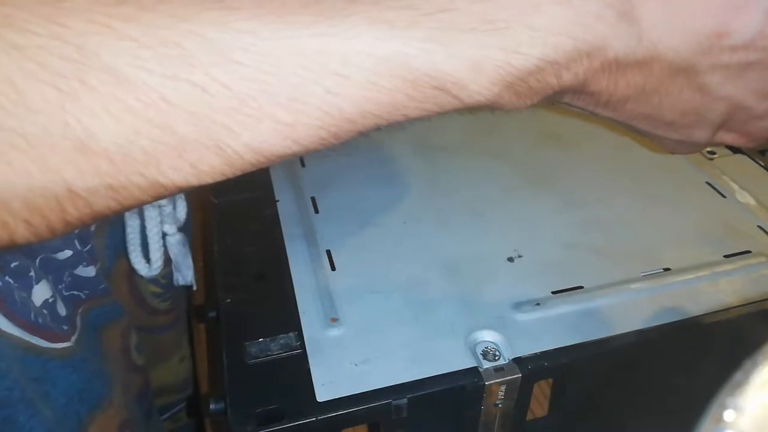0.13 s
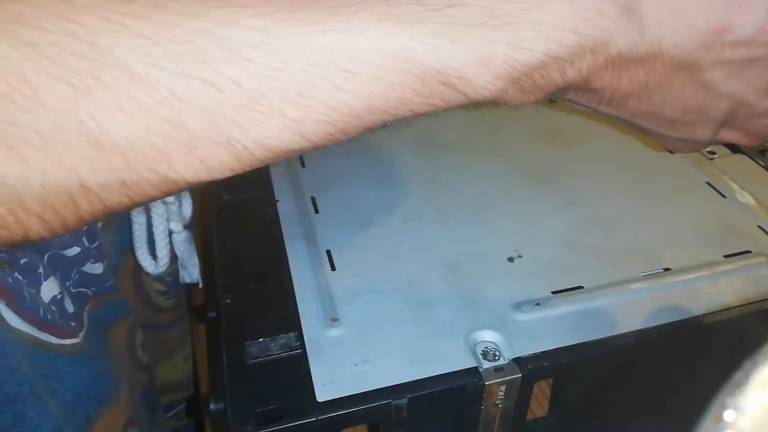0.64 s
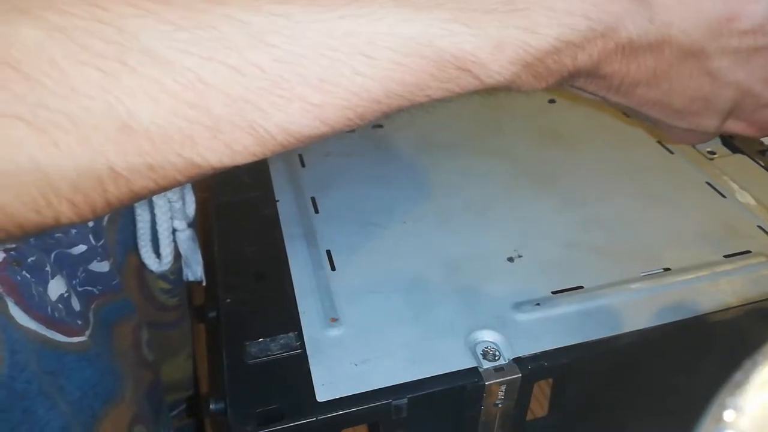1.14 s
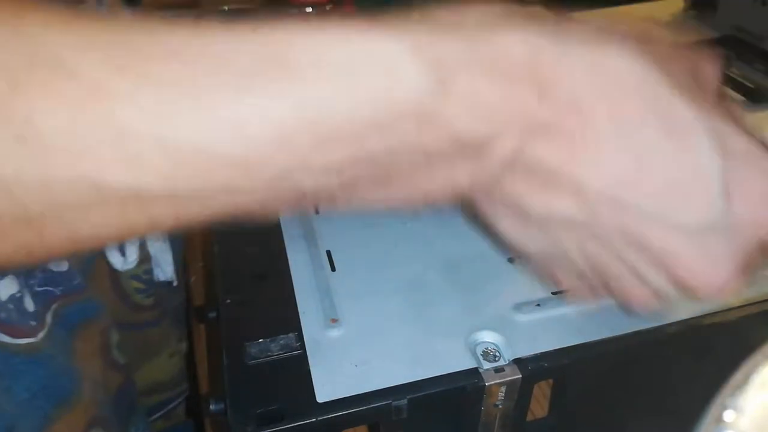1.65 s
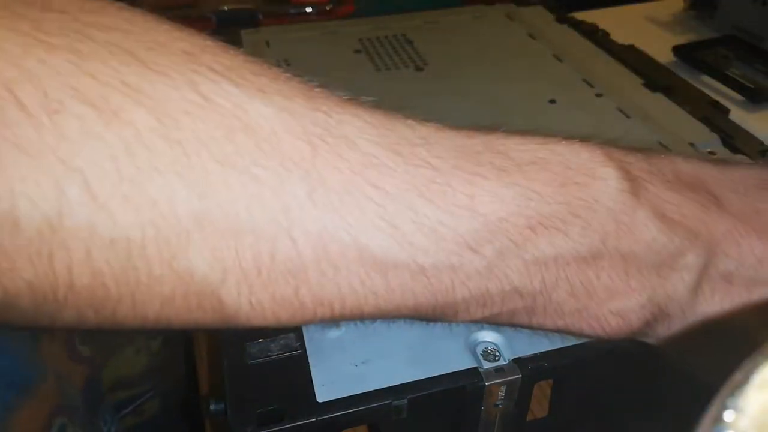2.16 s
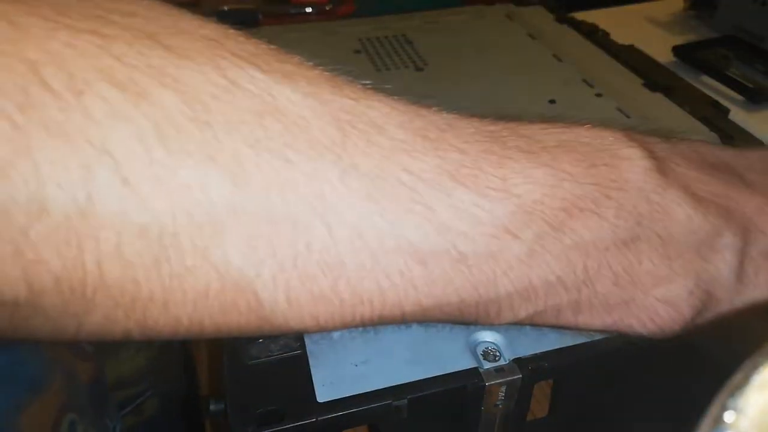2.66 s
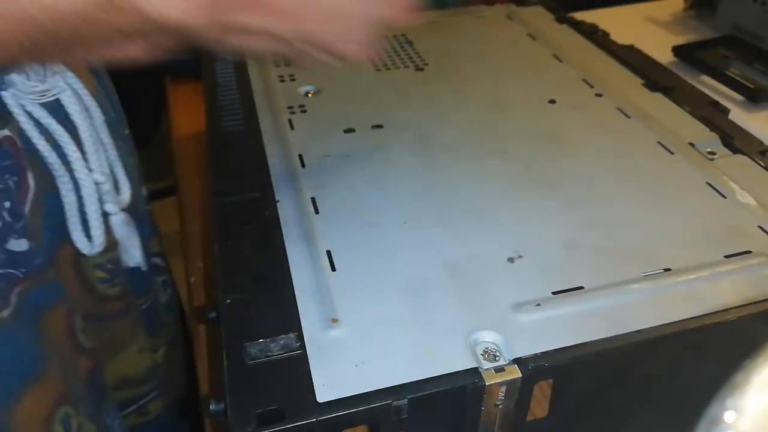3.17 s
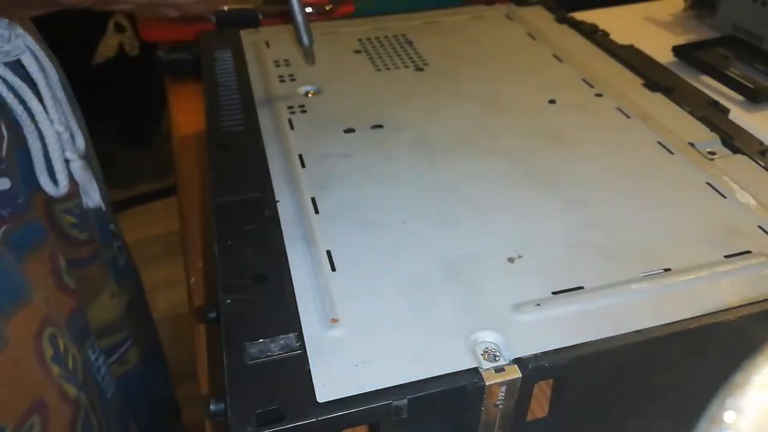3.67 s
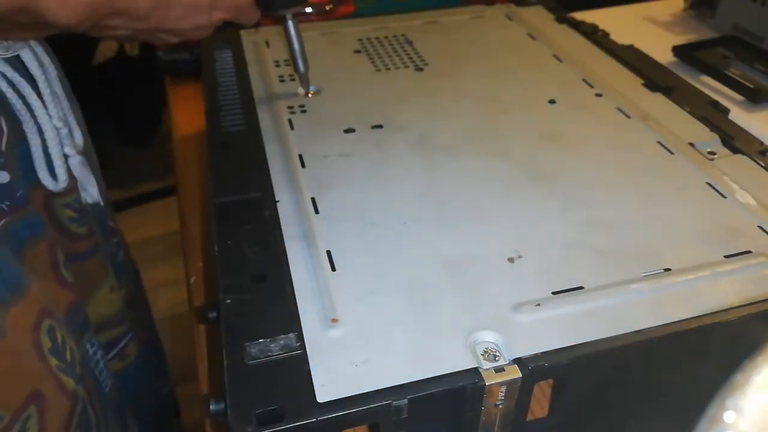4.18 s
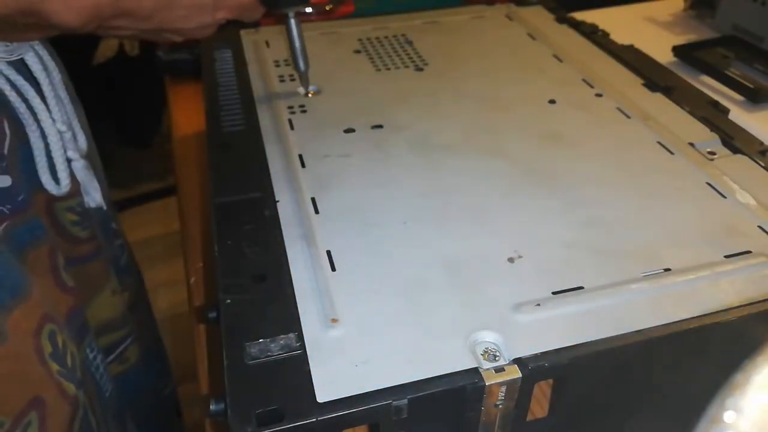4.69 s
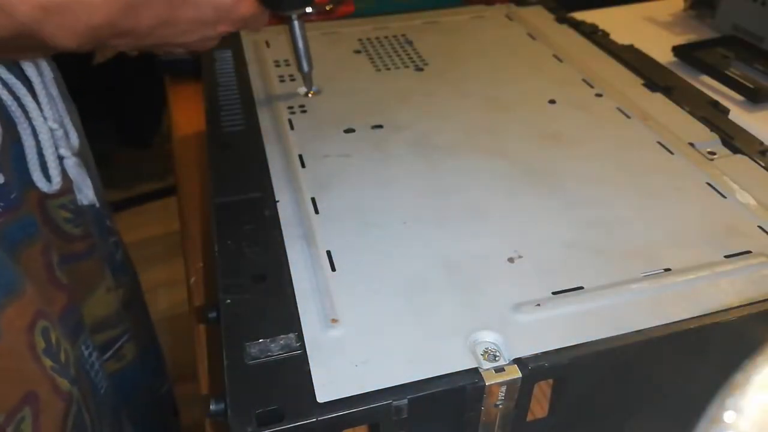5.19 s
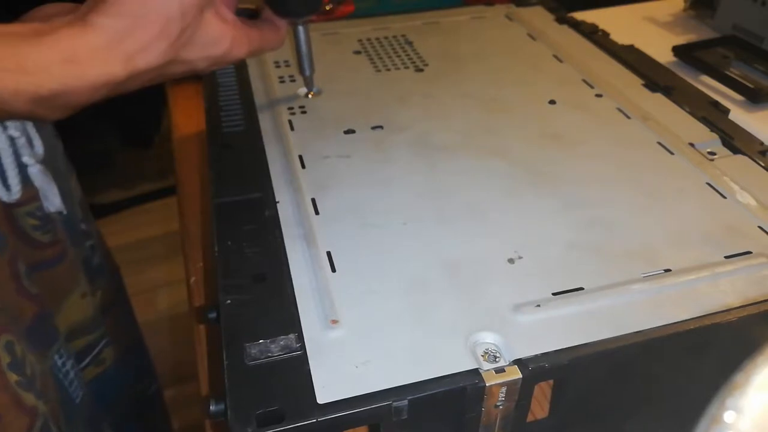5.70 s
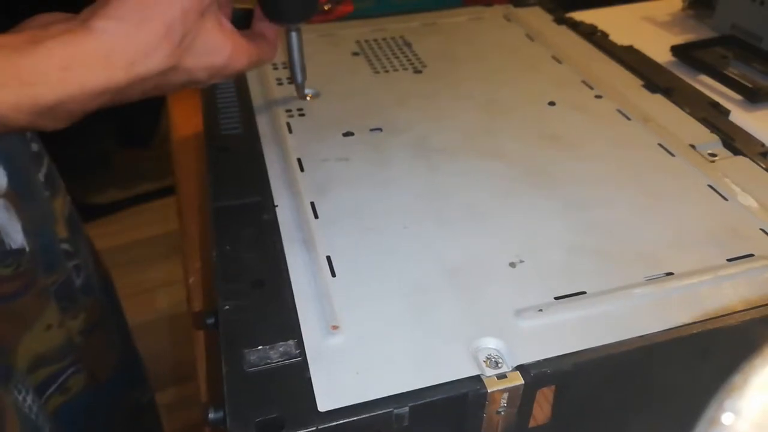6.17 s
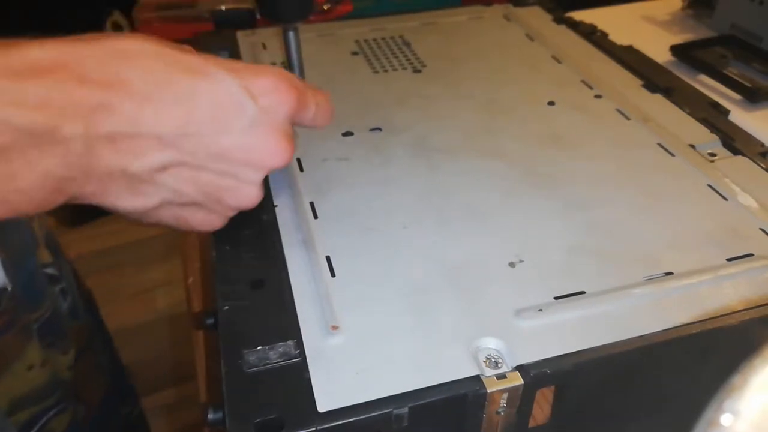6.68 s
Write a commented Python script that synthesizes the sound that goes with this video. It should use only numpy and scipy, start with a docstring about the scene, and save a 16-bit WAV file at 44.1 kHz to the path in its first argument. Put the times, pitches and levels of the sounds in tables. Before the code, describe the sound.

A small quiet room with faint air hiss and low rumble, heard in stereo an arm's length from the tool. From 0 to 1.1 s a steel bit lightly ticks and knocks on a sheet-metal panel, firmer near 1.05. At 1.28 and 1.37 s come two sharp clacks, with a tiny high whistle sagging in pitch between them. The cordless screwdriver then spins up fast and whines with bright, gritty gear hiss until 2.5 s, climbing slightly, soft thuds of the loose screw beneath, and brakes abruptly by 2.6 with three crisp clicks. Near quiet follows until a knock at 3.9 s, then irregular dull taps and ticks from 4.2 to 5.5. At 5.63 s a thin whistle and light gear crawl begin; loud clacks cluster around 5.8. A second, shorter, slightly softer run whirs from about 6.0 to 6.7 s, shaking the panel lower, then winds down quickly to a stop.

```python
"""On a bench in a small quiet room, a cordless screwdriver backs two screws out of a sheet-metal panel,
an arm's length from a stereo microphone. The motor sings on multiples of its shaft speed over noisy gear hiss
and shakes the panel's modes; the speed control whistles, a sine and its octave, at a light trigger pull.
Before and after the runs the bit ticks and knocks: short bursts ring the panel, and walls of decaying noise
answer everything the tool does."""
import sys
import numpy as np
from scipy import signal
from scipy.fft import rfft, irfft, next_fast_len
from scipy.io import wavfile
from scipy.ndimage import uniform_filter1d, map_coordinates

SR = 44100
rng = np.random.default_rng(int(sys.argv[2]) if len(sys.argv) > 2 else 0)


def voltage_ratio(level):
    """Linear amplitude factor for a level in decibels (scalar or array-like)."""
    return 10 ** (np.asarray(level, float) / 20)


def pcm_store(signal):
    """Save signal as 16-bit PCM."""
    levels = np.round(np.clip(np.atleast_2d(signal), -1, 1) * 32767)
    wavfile.write(sys.argv[1], SR, levels.astype(np.int16).T)


N = 300762
TIME = np.arange(N) / SR


def unit(x):
    """Scaled to rms 1."""
    return x / np.sqrt(np.mean(x ** 2))


def curve(rows, outside):
    """Columns of a table as tracks over time; a set value before and after it."""
    s, *columns = np.transpose(rows)
    return [np.interp(TIME, s, c, outside, outside) for c in columns]


def colour(x, points):
    """Noise given a spectrum of (Hz, dB) points, at rms 1."""
    hz, db = np.transpose(points)
    size = next_fast_len(N)
    log_hz = np.log(np.arange(size // 2 + 1) * SR / size + 1)
    shaped = rfft(x, size) * voltage_ratio(np.interp(log_hz, np.log(hz), db))
    return unit(irfft(shaped, size)[..., :N])


def band(x, lo_hz, hi_hz):
    """Band-pass."""
    return signal.sosfilt(signal.butter(2, [lo_hz, hi_hz], "band", fs=SR, output="sos"), x)


def walk(rate):
    """Random levels held 1 / rate s and smoothed twice."""
    k = int(SR / rate)
    held = np.repeat(rng.standard_normal(N // k + 1), k)
    return 0.95 * uniform_filter1d(uniform_filter1d(held, k), k)[:N]


def arch(start, length):
    """Rises from 0 to 1 and falls back over a span."""
    return np.sin(np.pi * np.clip((TIME - start) / length, 0, 1))


# Spectrum of the room's air. Each row: frequency in Hz, relative level in dB.
ROOM_AIR = [(18, -9), (30, 8.5), (69, 0), (108, -7), (318, -14), (471, -21.5), (1180, -18), (2330, -21.5),
            (3460, -23), (9610, -27), (15800, -36)]
# The low rumble swells. Each row: start in seconds, length in seconds, level in dB.
RUMBLE_SWELLS = [(-2, 2.66, -49.5), (2.5, 1.2, -61.5), (2.5, 1.5, -64.5)]


def room():
    """Faint hiss, unrelated left and right above the bass, over a low wavering rumble of narrow-band noise."""
    mid, side = colour(rng.standard_normal((2, N)), ROOM_AIR)
    air = mid + band(band(side, 150, 18000), 120, 18000) * np.array([[1], [-1]])
    rumble = unit(band(band(rng.standard_normal(N), 48, 50), 42, 72))
    swell = sum(voltage_ratio(db) * arch(s, length) for s, length, db in RUMBLE_SWELLS)
    return voltage_ratio(-63.5) * air + (voltage_ratio(-78) + swell) * rumble


def walls(x, t60_bench=0.031, t60_low=0.28, t60_high=0.25):
    """Quick reflections off bench and arms, then a short room tail; alike at both microphones in the bass only."""
    t = TIME[:SR // 2]
    mid, side = rng.standard_normal((2, len(t)))
    noise = mid + voltage_ratio(-0.5) * band(band(side, 270, 19010), 270, 19010) * np.array([[1], [-1]])
    low = band(noise, 40.5, 1510)
    tail = low * voltage_ratio(-60 * t / t60_low) + (noise - low) * voltage_ratio(-60 * t / t60_high)
    tail = tail + voltage_ratio(13.5) * noise * voltage_ratio(-60 * t / t60_bench)
    tail = tail * np.clip(t / 0.0016 - .5, 0, 1)  # nothing returns in the first 0.8 ms
    # many surfaces: no broad band of pitch is favoured
    bins = rfft(tail, SR)
    tail = irfft(bins / np.sqrt(uniform_filter1d(np.abs(bins) ** 2, size=90) + 1e-9), SR)[:, :len(t)]
    return signal.oaconvolve(x[None], tail / np.sqrt(np.sum(tail ** 2) / 2), axes=1)[:, :N]


# Panel and bench modes. Each row: frequency in Hz, relative level in dB when struck at the first screw,
# the same at the second screw, decay by 60 dB in seconds.
PANEL_MODES = [(117, -26, -26, 0.016), (156.9, -10.5, -11, 0.29), (228, -9, -12, 0.13),
               (287.6, 2, -5, 0.045), (552, -7, 6, 0.025), (718, 3, 2.5, 0.017), (930, 8.5, 2, 0.017),
               (1119, 7.5, 8, 0.016), (1275, 7.5, 5, 0.02), (1418, 2.5, 4.5, 0.033), (1485, 1, -14, 0.07),
               (1630, -6, -6, 0.02), (1795, -13.5, -7, 0.03), (2380, -14, -9, 0.03), (2660, -14, -9, 0.03)]
LOW_MODES_HZ, MOVES_S = 450, 3.0  # top of the low modes; when the tool goes to the second screw


def panel(force, low):
    """The force rings the low or the high modes of the panel, weighted by the screw the tool is at."""
    t, out = TIME[:SR // 2], 0
    for screw, there in enumerate([TIME < MOVES_S, TIME >= MOVES_S]):
        ring = 0
        for hz, *struck_db, t60 in PANEL_MODES:
            if (hz < LOW_MODES_HZ) == low:
                ring = ring + voltage_ratio(struck_db[screw] - 60 * t / t60) * np.sin(2 * np.pi * hz * t)
        out = out + signal.oaconvolve(force[:N] * there, ring / np.abs(ring).max())[:N]
    return out


# Bit and tool against the panel, and at 5.665 and 5.687 s two cogging clicks of the motor at a light pull. Each
# row: time in seconds, then relative levels in dB of ring, thud, tick, snap.
KNOCKS = [(0.0, -34, -40, -40, -40), (0.131, -35, -38.5, -27, -31), (0.146, -35.5, -58, -37.5, -59),
          (0.414, -52, -51.5, -62, -71), (0.822, -57, -46, -70, -70), (0.832, -34, -38, -37.5, -47),
          (0.85, -39, -44, -34, -45), (0.869, -37, -35.5, -32, -46.5), (1.041, -46, -49, -48, -55),
          (1.047, -26, -37.5, -40, -44), (1.051, -21, -36, -34, -44), (1.056, -36, -26.5, -22, -28.5),
          (1.275, -33, -43, -39, -42.5), (1.282, -15.5, -31, -13, -14.5), (1.369, -16, -19.5, -16, -16),
          (2.586, -29.5, -48, -30, -25.5), (2.623, -34.5, -45, -26, -21.5), (2.653, -36, -67, -22, -19.5),
          (3.368, -55.5, -71, -69, -75.5), (3.914, -20, -36, -29.5, -43.5), (4.21, -32, -42.5, -79, -67),
          (4.377, -21, -33, -39, -51), (4.422, -29.5, -38.5, -22, -25.5), (4.479, -26, -43, -35, -43.5),
          (4.523, -36, -50.5, -47.5, -58), (4.745, -26, -44, -37.5, -50), (4.993, -45.5, -53, -65, -70),
          (5.003, -32, -29.5, -38.5, -39), (5.02, -27.5, -49, -49.5, -55),
          (5.177, -27.5, -48, -40.5, -54.5), (5.23, -43, -60, -75, -77), (5.285, -34.5, -60, -68, -81.5),
          (5.319, -29, -41.5, -68, -68.5), (5.401, -53, -67.5, -80, -82), (5.449, -45.5, -52, -69.5, -71),
          (5.459, -35, -61, -75, -76), (5.636, -45, -48, -48, -60), (5.665, -66, -68, -62, -46.5),
          (5.687, -59, -68, -58, -43), (5.786, -15, -30, -19, -22), (5.789, -8, -26, -13, -18),
          (5.811, -15.5, -50, -19.5, -22), (5.816, -10.5, -33, -12.5, -12),
          (5.822, -7.5, -27, -11.5, -13.5)]
# The loose screw rocks in its hole. Each row: time in seconds, relative thud level in dB.
SCREW_THUDS = [(2.223, -27), (2.334, -25.5), (2.455, -29), (2.509, -38)]
# the duller a contact against its ring, the longer it lasts
HARD_MS, SOFT_MS, MS_PER_DB = 1.1, 5.4, 1
# a duller contact pushes more softly and scatters less (dB per dB)
PAD_MS_PER_DB, CLEAN = 0.005, 0.23
# in ring and in tick: strength of the first clean blow against the scatter after it
LEAD, CRACK = voltage_ratio(-6.5) * 1.79, 4.5


def knocks():
    """Each contact: a blow and scattered impacts on the high modes, a tick, a snap, and a push on the low modes."""
    ring, thud, tick, snap = np.zeros((4, N + 2048))
    t = TIME[:2048]
    push = np.hanning(int(0.0036 * SR))
    push = push / push.sum()
    for s, ring_db, thud_db, tick_db, snap_db in KNOCKS:
        i = int(s * SR)
        dull_db = ring_db - max(tick_db, snap_db)
        ms = np.clip(HARD_MS + MS_PER_DB * dull_db, HARD_MS, SOFT_MS)
        burst = rng.standard_normal(2048) * np.exp(-1000 * t / ms) * (1 - np.exp(-1000 * t / (0.11 * ms)))
        scatter = voltage_ratio(-7.0 - CLEAN * max(dull_db, 0))
        blow = scatter * burst / np.sqrt(np.sum(burst ** 2))
        blow[8] += LEAD
        pad_s = 1e-5 + PAD_MS_PER_DB * max(dull_db, 0) / 1000
        pad = t[1:128] * np.exp(-t[1:128] / pad_s)
        ring[i:i + 2048] += voltage_ratio(ring_db) * np.convolve(blow, pad / pad.sum())[:2048]
        burst[8] += CRACK
        tick[i:i + 2048] += voltage_ratio(tick_db) * burst
        snap[i:i + 2048] += voltage_ratio(snap_db) * burst
        thud[i:i + len(push)] += voltage_ratio(thud_db) * push
    for s, thud_db in SCREW_THUDS:
        i = int(s * SR)
        thud[i:i + len(push)] += voltage_ratio(thud_db) * push
    body = voltage_ratio(11.5) * band(panel(ring, low=False), 340, 6000) + voltage_ratio(14.0) * panel(thud, low=True)
    crowd = voltage_ratio(18.0) * band(ring, 550, 1850)[:N]  # besides the few clear modes, many short ones
    bit = voltage_ratio(7.5) * band(tick, 4550, 4800)[:N]  # the steel bit rings briefly
    click = voltage_ratio(9.5) * band(tick, 1500, 6000)[:N]
    crisp = voltage_ratio(13.0) * band(band(snap, 7160, 11560), 5000, 11000)[:N]
    crisp = crisp + voltage_ratio(-3.5) * band(snap, 6000, 16500)[:N]
    return body + crowd + bit + click + crisp


# Full trigger pulls. Each row: start in seconds, release in seconds, shaft speed it climbs towards in Hz,
# time constant of the screw loosening in seconds, relative gear level in dB.
RUNS = [(1.376, 2.493, 316.5, .2, -22.5), (5.983, 6.689, 310.7, .12, -25)]
# speed missing at the start by inertia, its time constant, and speed missing by the tight screw
SPIN_UP_HZ, SPIN_UP_S, LOAD_HZ = 77.7, .045, 45.08
# after release: easing off, then the brake bites just before the stop
COAST_HZ_PER_S2, BITE_HZ, BITE_S, BRAKE_S = 3800, 59.7, .009, .112


def speed(run):
    """Shaft speed in Hz: quick spin-up, a slower climb as the screw frees, braking; zero at rest."""
    start, release, top_hz, loosen_s, _ = run
    t, off = np.maximum(TIME - start, 0), np.clip(TIME - release, 0, BRAKE_S)
    hz = top_hz - SPIN_UP_HZ * np.exp(-t / SPIN_UP_S) - LOAD_HZ * np.exp(-t / loosen_s)
    hz = hz - COAST_HZ_PER_S2 * off ** 2 - BITE_HZ * np.exp((off - BRAKE_S) / BITE_S)
    return hz * (TIME >= start) * (TIME < release + BRAKE_S)


# Light trigger pulls, one for each run. Each row: start in seconds, crawl length in seconds, relative level in dB.
CRAWLS = [(1.3, 0.12, -31), (5.636, 0.39, -31)]
# the level follows speed after release, and eases as the screw gives
BRAKE_DB_PER_HZ, SAG_DB_PER_S = 0.1, 4
RISE_S = 0.029  # time constant of the gears taking the load


def effort(run, crawl):
    """Gain of the gear train through a crawl and the run that goes with it."""
    start, release, top_hz, _, db = run
    crawl_start, crawl_length, crawl_db = crawl
    hz = speed(run)
    slow_db = BRAKE_DB_PER_HZ * (TIME > release) * (top_hz - hz)
    full = voltage_ratio(db - slow_db - SAG_DB_PER_S * (TIME - start)) * (hz > 0)
    full = full * (1 - np.exp(-np.maximum(TIME - start, 0) / RISE_S))
    light = voltage_ratio(crawl_db) * arch(crawl_start, crawl_length) ** 1.4
    return np.hypot(uniform_filter1d(full, size=600), light)


# Each screw hole, in the order of the runs. Each row: low and high edge in Hz of the panel bass it shakes most,
# shaking in dB against the gear level, relative dB of that bass, relative dB of the bench rumble.
SCREW_HOLES = [(250, 280, -25.5, 3.5, -26), (138.9, 171.3, -13.5, 1, -7)]


def shaking():
    """The gears shake the panel through the bit: a noise force on its modes, following the gear train."""
    force = rng.standard_normal(N) * voltage_ratio(1.27 * walk(20))
    low = unit(band(panel(force, low=True), 84, 360))
    high = unit(panel(force, low=False))
    bench = unit(band(force, 18, 46))
    out = 0
    for run, crawl, (lo_hz, hi_hz, db, bass_db, bench_db) in zip(RUNS, CRAWLS, SCREW_HOLES):
        bass = voltage_ratio(bass_db) * unit(band(force, lo_hz, hi_hz))
        shaken = bass + voltage_ratio(0.5) * low + voltage_ratio(3.0) * high + voltage_ratio(bench_db) * bench
        out = out + voltage_ratio(db) * effort(run, crawl) * shaken
    return out


# The speed control at a light pull. Each row: start in seconds, length in seconds, relative level in dB, fall in Hz.
WHISTLES = [(1.302, 0.053, -26.5, 630), (5.629, .15, -27.5, 439), (5.944, .062, -31, 450)]
WHISTLE_HZ, WHISTLE_HOLD = 4600, 0.16  # pitch, and share of its length before the pitch gives way


def whistle():
    """The switching tone and its octave hold, then sag and roughen as the motor takes load."""
    out = 0
    for start, length, db, fall_hz in WHISTLES:
        load = np.clip(((TIME - start) / length - WHISTLE_HOLD) / 0.7, 0, 1)
        hz = WHISTLE_HZ - fall_hz * np.sin(np.pi / 2 * load) ** 2
        jitter = (0.001 + 0.006 * load) * walk(200)
        phase = 2 * np.pi * np.cumsum(hz * (1 + jitter)) / SR
        tone = np.sin(phase) + voltage_ratio(-7.0 - 8.0 * load) * np.sin(2 * phase)
        rough_db = (0.5 + 4.0 * load) * walk(100)
        shape_db = -4.0 * load ** 4 - 7 * (1 - load) ** 3
        out = out + voltage_ratio(db) * arch(start, length) ** .8 * tone * voltage_ratio(rough_db + shape_db)
    return out


# Commutator tone of each run. Each row: relative dB throughout, dB added by the housing resonance
# while rising, the same after release.
COMMUTATOR_TONE = [(-37, -36, -28.5), (-53.5, -29.5, -33.5)]
HOLLOW_HZ, HOLLOW_WIDTH_HZ = 790, 115  # housing resonance the tone sweeps through
# gear whine that climbs with the spin-up and fades out from the start of the run
WHINE_MULTIPLE, WHINE_DB, WHINE_FADE_DB_PER_S = 15, -31, 75


def commutator():
    """A tone of three beats a turn, louder while it passes the housing resonance, and the start-up gear whine."""
    out = 0
    for run, (db, rise_db, brake_db) in zip(RUNS, COMMUTATOR_TONE):
        start, release = run[:2]
        shaft_hz = speed(run)
        turn = 2 * np.pi * np.cumsum(shaft_hz) / SR
        near_hollow = np.exp(-((3 * shaft_hz - HOLLOW_HZ) / HOLLOW_WIDTH_HZ) ** 2)
        hollow = voltage_ratio(np.where(TIME > release, brake_db, rise_db)) * near_hollow
        flutter = voltage_ratio(1.1 * walk(8.7) + 1.8 * walk(60))
        whine_gain = voltage_ratio(WHINE_DB - WHINE_FADE_DB_PER_S * np.abs(TIME - start))
        whine = whine_gain * np.sin(WHINE_MULTIPLE * turn)
        out = out + (shaft_hz > 0) * flutter * ((voltage_ratio(db) + hollow) * np.sin(3 * turn) + whine)
    return out


# Spectrum of the gear hiss through the housing. Each row: frequency in Hz, relative level in dB.
HOUSING = [(300, -18.5), (950, -7), (1500, -3), (1900, -8.5), (3700, -5), (4350, -3), (5100, -11),
           (6300, -12.5), (8000, -7), (9400, -1.5), (10800, -7), (11700, -14.5), (13200, -21.5),
           (14000, -39), (15900, -45)]
# Shaft tones that stand out. Each row: multiple of the shaft speed, dB above the rest.
STRONG_MULTIPLES = [(6, 12), (8, 5), (9, 5), (12, 12), (15, 3), (18, 3), (29, 11), (31, 3), (33, 4),
                    (34, 6), (35, 4), (36, 7), (37, 4), (38, 4)]
# How the housing radiates the shaft tones. Each row: frequency in Hz, relative level in dB.
SING = [(1500, -33.5), (4200, -20), (6300, -26.5), (9100, -5.5), (9900, -5), (10650, 0), (11300, -7.5),
        (12500, -12), (16000, -14.5)]
# Rough bands where the gear teeth mesh. Each row: multiple of the shaft speed, relative level in dB, flutter per second.
GEAR_MESH = [(14.9, -2.5, 200), (8.9, -19, 230), (29.6, 2, 300)]
GRIND_DB, GRIND_PER_S = 2.3, 120  # the teeth catch unevenly


def motor():
    """Shaft tones that each waver alone with rough mesh bands, and gear hiss pulsing with each turn."""
    hz = sum(speed(run) for run in RUNS)
    turn = 2 * np.pi * np.cumsum(hz * (1 + 0.00016 * walk(40.03))) / SR
    sing_hz, sing_db = np.transpose(SING)
    strong_db = dict(STRONG_MULTIPLES)
    tones = 0
    for k in range(6, 60):
        db = np.interp(k * hz, sing_hz, sing_db, right=-90) + strong_db.get(k, 0) + 1.5 * walk(27)
        tones = tones + voltage_ratio(db) * np.sin(k * turn + rng.uniform(0, 2 * np.pi))
    for multiple, db, rate in GEAR_MESH:
        tones = tones + voltage_ratio(db) * walk(rate) * np.sin(multiple * turn)
    hiss = colour(rng.standard_normal(N), HOUSING) * (1 + 0.27 * np.sin(turn))
    hiss = hiss * voltage_ratio(0.47 * walk(30) + GRIND_DB * walk(GRIND_PER_S))
    gain = sum(map(effort, RUNS, CRAWLS))
    return gain * hiss, gain * voltage_ratio(-12.0) * tones * (hz > 0)


# Where the tool is. Each row: time in seconds, left minus right in dB, delay of the left in milliseconds.
TOOL_PLACE = [(0, -1, 0.49), (.95, -0.5, 0.92), (1.0, -3.5, 0.36), (1.9, -4.5, 0.21), (2.1, 0.5, 0.14),
              (3.0, 5, 0.26), (3.6, 0.5, -0.125), (5.9, -0.5, -0.12), (6.4, 4, -0.18), (6.82, 2, -0.18)]


def scene():
    """The tool reaches two microphones at different times, then by reflections; the body between shades the treble."""
    hiss, shaft = motor()
    hits = knocks()
    tool = hiss + shaking() + whistle() + voltage_ratio(2.5) * hits
    tone = shaft + commutator()
    pan_db, lag_ms = curve(TOOL_PLACE, 0)
    heard_at = np.arange(N) - lag_ms * SR / 1000
    left = map_coordinates(tool + voltage_ratio(2.5) * tone, [heard_at], order=3, mode="nearest")
    right = tool + voltage_ratio(5.0) * tone
    # hands and tool keep moving, so the pattern of reflections drifts between two states and back
    sway = 2 * np.pi * 1.6 * TIME + walk(2.997)
    sent = tool - 0.56 * hits + voltage_ratio(-12.0) * tone
    echo = walls(sent * np.cos(sway)) + walls(sent * np.sin(sway))
    near = voltage_ratio(-5.5) * np.array([left, right]) + voltage_ratio(-0.5) * echo
    shade = voltage_ratio(np.array([pan_db, -pan_db]) / 2) - 1
    return near + shade * band(near, 250, 15000) + room()


def top_cut(x):
    """Nothing passes above the cut-off."""
    return signal.sosfilt(signal.butter(12, 15970, fs=SR, output="sos"), x)


def record(dry):
    """The microphone drops the deep bass and rounds the loudest peaks."""
    thin = signal.sosfilt(signal.butter(2, 57, "high", fs=SR, output="sos"), dry)
    mix = np.tanh(0.92 * thin) / 0.87
    return top_cut(mix)


dry = scene()
out = record(dry)
pcm_store(out)
```